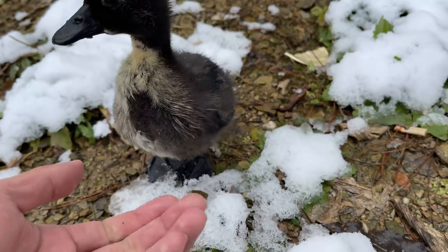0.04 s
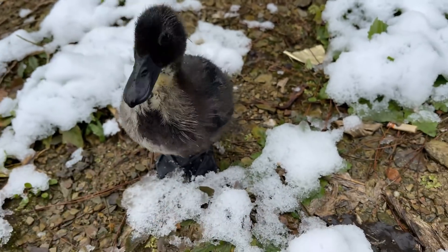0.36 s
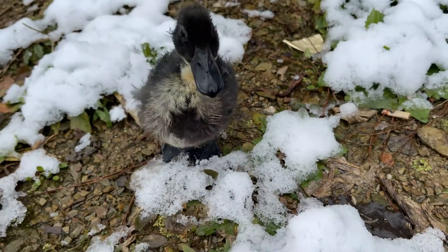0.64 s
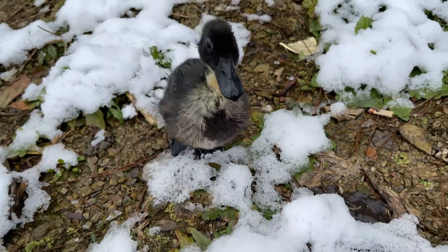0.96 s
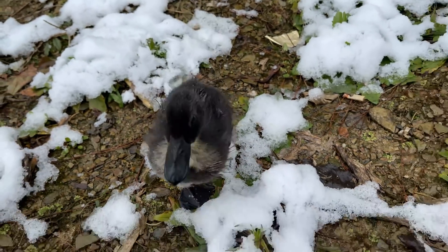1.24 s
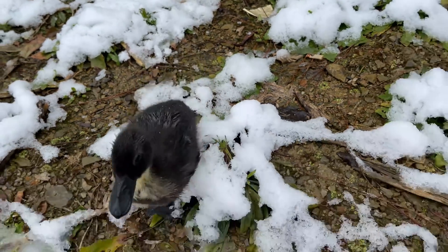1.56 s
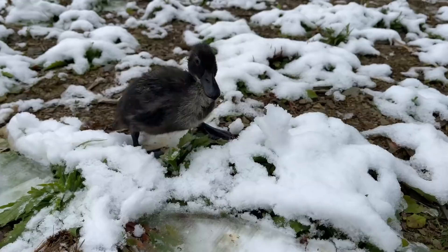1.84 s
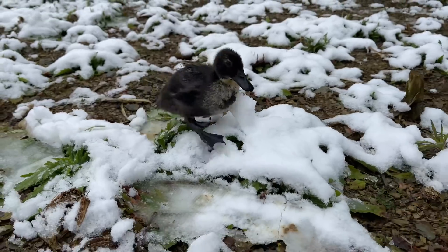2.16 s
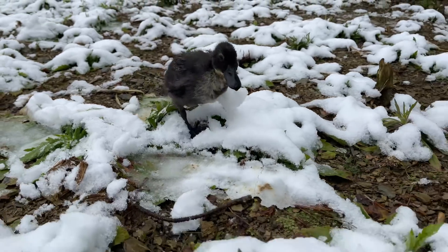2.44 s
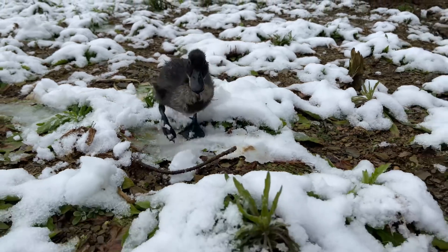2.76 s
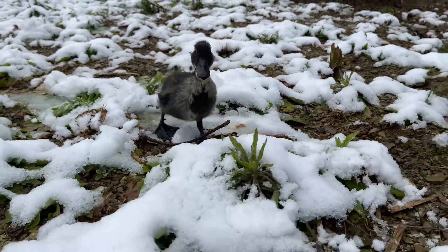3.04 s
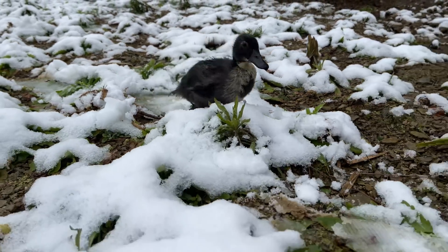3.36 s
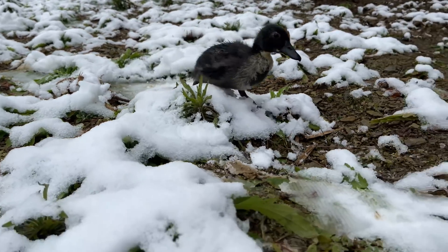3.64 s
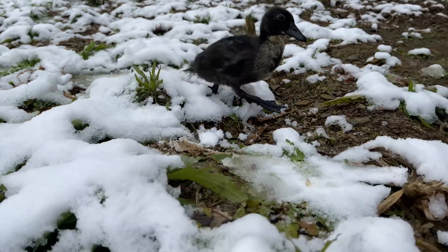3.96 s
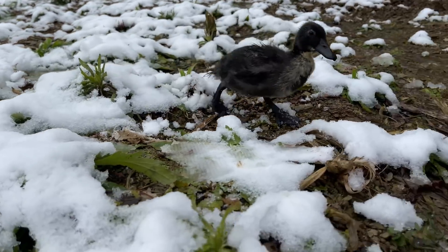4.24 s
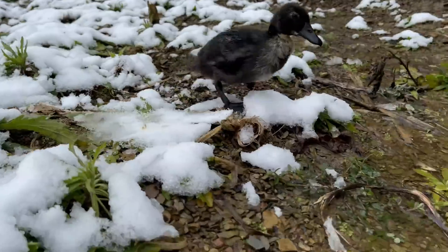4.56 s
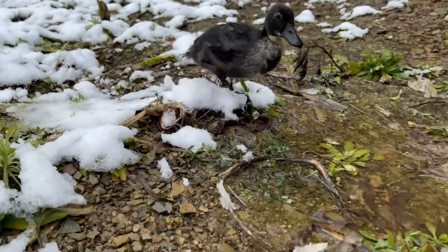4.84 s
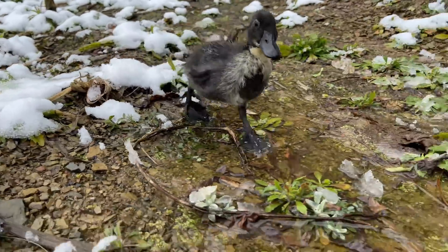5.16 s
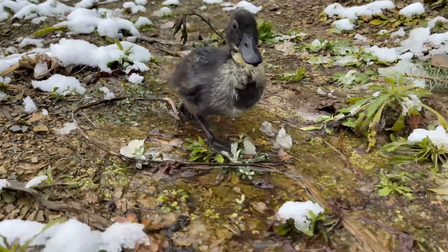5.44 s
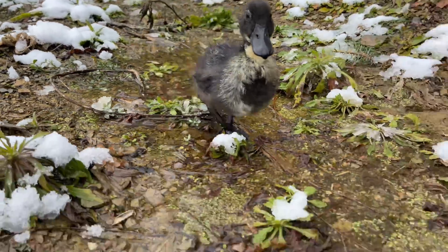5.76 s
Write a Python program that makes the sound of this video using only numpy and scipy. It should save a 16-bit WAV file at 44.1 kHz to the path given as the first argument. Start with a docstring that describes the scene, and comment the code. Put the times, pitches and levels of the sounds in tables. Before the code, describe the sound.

A duckling peeps close by in short high whistles while someone's footsteps scuff and crunch over gravel and wet snow.

```python
"""Outdoors on gravel and wet snow, a duckling peeps close by as it walks. Each peep is a short whistle
that rises and falls, with a second voice beating against it. Someone walks along with it: clothes
rustle and each tread scuffs and crunches, with dull footfalls, small knocks, ticks of grit and one
rubbery squeak. A soft hiss and a low rumble lie underneath, and the sound drops out once for a moment."""
import sys
import numpy as np
from scipy import signal
from scipy.io import wavfile
from scipy.ndimage import uniform_filter1d

SR = 44100
rng = np.random.default_rng(int(sys.argv[2]) if len(sys.argv) > 2 else 0)


def file_out(sig):
    """Save sig as 16-bit WAV at sys.argv[1]."""
    # one column per channel
    cols = np.atleast_2d(sig).T
    # limit, then scale
    lim = np.clip(cols, -1, 1)
    pcm = np.round(lim * 32767).astype(np.int16)
    wavfile.write(sys.argv[1], SR, pcm)


N = 264820
TIME = np.arange(N) / SR
GROUND_LAG_MS, CUTOFF_HZ = .25, 14000

# The tone of six noises. Each row: pitch in Hz, relative strength there in dB.
AIR_TONE = [(30, -17), (80, 12), (350, 6.5), (800, -10.5), (2000, 9), (3500, 1), (7000, 0), (11000, -32.5)]
RUMBLE_TONE = [(25, -22.5), (50, 3.5), (100, -3), (200, -9.5), (400, -11.5), (900, -59)]
SCUFF_TONE = [(120, -7), (350, -3), (700, -5), (1400, 0), (2200, -9), (4000, -10), (9000, -64)]
GRAVEL_TONE = [(1000, -0.5), (2400, 3.5), (3600, 3), (5000, 4), (6400, 7.5), (7600, -5), (9000, -33)]
CRUST_TONE = [(4000, -14), (6500, -12.5), (8300, 44.5), (11500, 19.5), (14000, -62)]
FOOTFALL_TONE = [(50, -14), (130, -2), (300, -1.5), (430, -6), (650, -17.5), (1500, -43)]
# How alike a noise is on the left and right. Each row: pitch in Hz, likeness from 0 to 1.
STEREO_LIKENESS = [(50, 0.938), (300, 0.594), (900, 0.49), (2000, 0.061), (5000, 0.0104), (8000, 0.0164),
                   (10500, 1)]
# Air and handling on the microphone. Each row: time in seconds, level in dB.
RUMBLE_LEVELS = [(0.0, -52), (0.14, -73), (0.22, -46.5), (0.9, -56), (1.35, -41.5), (1.62, -47.5),
                 (1.76, -64), (2.35, -53.5), (3.0, -64.5), (4.25, -53), (4.45, -45), (4.85, -39.5),
                 (5.2, -47.5), (6.0, -36)]
# Where the walker's feet are. Each row: time in seconds, lag in ms (see two_ports), left over right in dB.
FOOT_POSITIONS = [(0.0, -.25, 1), (0.75, -.25, 3.5), (1.3, -.09, -.5), (1.7, -.09, 0), (2.3, .25, -1),
                  (4.5, .3, -4), (5.5, .27, -1), (6.0, .27, -1)]
# Clothes and loose ground rustle. Each row: time in seconds, level in dB, treble level in dB.
RUSTLE_LEVELS = [(0.0, -43.5, -56), (0.5, -53, -74), (0.95, -42.5, -48.5), (1.6, -58.5, -64),
                 (1.76, -56, -52), (2.0, -54.5, -49.5), (2.65, -52, -51.5), (2.95, -56, -58),
                 (3.38, -61, -58.5), (3.65, -53.5, -52.5), (3.9, -55, -51.5), (4.4, -48, -58),
                 (4.88, -48.5, -50), (5.22, -50.5, -50.5), (5.7, -49, -48), (6.0, -43, -37)]
# Shoes press into the ground. Each row: time of fullest weight, swell and release, all in seconds,
# then the levels of the scuff, the gravel and the snow crust in dB.
TREADS = [(0.274, 0.0435, 0.039, -33, -35, -42), (0.38, 0.107, 0.188, -36.5, -38.5, -45.5),
          (0.55, 0.0605, 0.145, -32, -41, -47.5), (0.637, 0.061, 0.186, -30, -27.5, -33.5),
          (0.73, 0.205, 0.263, -35.5, -37, -35), (1.10, 0.247, 0.584, -38.5, -62, -46),
          (1.302, 0.138, 0.21, -34, -33.5, -43.5), (1.38, 0.0245, 0.194, -38, -36.5, -34),
          (1.44, 0.145, 0.17, -32.5, -34.5, -34), (1.565, 0.24, 0.052, -34, -33.5, -33.5),
          (1.651, 0.0712, 0.085, -31, -28.5, -25.5), (1.811, 0.0123, 0.12, -34, -27.5, -35.5),
          (1.898, 0.093, 0.133, -64.5, -36.5, -41), (2.17, 0.051, 0.064, -43, -44, -40.5),
          (3.263, 0.067, 0.07, -43, -44, -39.5), (3.50, 0.071, 0.188, -42.5, -44, -39),
          (3.61, 0.058, 0.066, -64, -43.5, -40.5), (4.03, 0.029, 0.25, -44.5, -46, -51),
          (4.17, 0.107, 0.192, -46.5, -41.5, -54), (4.285, 0.096, 0.63, -44, -38, -49),
          (4.44, 0.35, 0.247, -37, -45, -59), (4.52, 0.16, 0.232, -34.5, -38, -63),
          (4.63, 0.106, 0.083, -58.5, -38, -33.5), (4.767, 0.077, 0.22, -39, -37, -33.5),
          (5.34, 0.045, 0.17, -58, -41, -45.5), (5.509, 0.173, 0.163, -40.5, -37.5, -47.5),
          (5.97, 0.22, 0.07, -39.5, -40.5, -49)]
# The pitches in Hz at which stones and crystals crackle.
CRACKLE_HZ = [1820, 2740, 3850, 5220, 6480, 8330]
# Dull steps. Each row: start in seconds, level in dB, ring time (seconds to fade by 60 dB).
FOOTFALLS = [(0.275, -36.5, 1.88), (.535, -41, 1.01), (.757, -25, 0.136), (1.072, -32.5, 0.254),
             (1.305, -26.5, 0.119), (1.55, -35.5, 0.24), (2.096, -42.5, 1.49), (3.233, -41.5, 2.26),
             (4.411, -40, 0.56), (5.328, -31.5, 1.627), (5.611, -46.5, 1.36), (5.956, -28, 0.089)]
# Stones grind (low) and ice breaks (high). Each row: start and length in seconds, level in dB,
# middle pitch in Hz.
CRUNCHES = [(0.536, 0.12, -41, 788), (1.262, 0.0796, -34.5, 863), (1.355, 0.0386, -32, 976),
            (1.376, 0.07, -55.5, 11800), (1.418, 0.149, -40.5, 728), (1.51, 0.0714, -38.5, 388),
            (1.552, 0.0407, -44, 11800), (1.609, 0.0834, -37.5, 11600), (1.634, .03, -45, 680),
            (3.234, .3, -55, 680), (4.39, 0.1244, -40.5, 782), (4.47, 0.1202, -43.5, 420.5),
            (4.725, 0.0816, -43.5, 1190), (4.735, 0.08, -41.5, 6900)]
# Knocks on stones and wet ground. Each row: start in seconds, level in dB, pitch in Hz,
# ring time in seconds, relative level of the crack in dB.
KNOCKS = [(0.2452, -12, 1388, 0.0235, -37), (0.2459, -7, 2477, 0.0177, -32),
          (0.2478, -18.5, 187, 0.039, -21.5), (.2735, -18, 1080, 0.0072, -2),
          (0.2755, -9, 339.6, 0.0125, -30), (0.55, -12, 990, 0.00595, -27), (.604, -19, 926, 0.0137, -11.5),
          (0.755, -8, 1539, 0.0285, -9), (.759, -19.5, 970, 0.0295, -12),
          (0.763, -14.5, 149.5, 0.02, -24.5), (0.885, -21, 3600, .012, -3.5),
          (0.908, -28, 1100, 0.0144, -7), (0.974, -15, 857, 0.0122, -10), (1.372, -17.5, 900, 0.0165, -1.5),
          (1.381, -20, 376, 0.014, -16), (1.432, -21, 600, 0.0263, -11.5), (1.557, -29, 254, 0.026, -2),
          (1.575, -26, 508, 0.0324, -10), (1.64, -19.5, 803, 0.0102, -5.5), (1.806, -28, 1900, 0.0204, 2),
          (2.000, -23.5, 591, 0.032, -31), (2.0075, -20, 605.4, 0.0213, -25),
          (2.089, -34, 990, 0.0086, -10.5), (2.103, -32, 208, 0.036, -28), (2.239, -26.5, 653, 0.0072, -9),
          (2.322, -18.5, 1864, 0.0168, -8), (2.3252, -28.5, 779, 0.0253, 1.5),
          (2.328, -35, 332, 0.023, 2.5), (2.383, -37, 900, 0.0133, 10.5), (2.657, -26, 1075, 0.0126, -1),
          (3.035, -23.5, 894, 0.0062, -10), (4.386, -31.5, 2780, 0.0067, 11), (4.419, -27, 1430, 0.0147, 7),
          (4.519, -35.5, 1200, 0.0112, 5), (4.509, -23, 374, 0.04, -18.5), (4.531, -28.5, 353, 0.045, -4),
          (4.701, -21, 1905, 0.026, -21.5), (5.017, -27.5, 599, 0.026, -2), (5.228, -29, 693, 0.017, 9.5),
          (5.33, -31.5, 248, 0.038, -19.5), (5.563, -21.5, 656, 0.0082, 8.5),
          (5.795, -35, 4160, 0.0115, 8.5)]
# Grit and ice. Each row: start in seconds, peak level in dB, pitch in Hz, ring time in seconds.
TICKS = [(0.049, -26.5, 9300, 0.0091), (0.35, -26, 10600, 0.0065), (0.884, -19.5, 8460, 0.02),
         (0.898, -28.5, 9670, 0.012), (1.025, -26, 8950, 0.0041), (1.095, -21.5, 9500, 0.062),
         (1.445, -12.5, 10000, 0.0058), (1.457, -22, 9950, 0.0095), (1.494, -22.5, 6170, 0.016),
         (2.385, -28, 8400, 0.019), (2.5113, -24, 10120, 0.018), (2.631, -28, 6960, 0.0194),
         (2.662, -33, 4200, 0.0044), (2.7006, -17, 2590, 0.00805), (2.744, -30, 7170, 0.097),
         (2.98, -27.5, 9080, 0.0052), (4.4456, -23, 9370, 0.0094), (4.488, -29, 7000, .008),
         (4.531, -22, 6440, 0.0117), (4.7404, -30, 8900, 0.116), (5.115, -17, 9780, 0.029),
         (5.1598, -24, 9430, 0.011), (5.2275, -14, 6380, 0.0179), (5.4559, -24.5, 8100, 0.01),
         (5.563, -9.5, 10250, 0.0081), (5.574, -25.5, 9600, 0.0047), (5.5921, -21, 9220, 0.0078),
         (5.7971, -26.5, 4940, 0.006), (5.847, -20.5, 8600, 0.0053)]
# The course of the squeak. Each row: time in seconds, slips per second, level in dB, brightness in dB,
# pitch of the low ring in Hz, relative level of the middle ring in dB.
SQUEAK_CURVES = [(.774, 370, -42, -25, 380, -14), (.779, 375, -21, -25, 400, -14),
                 (.788, 380, -19.5, -10, 620, -7), (.799, 385, -21, -22, 770, -11),
                 (.807, 410, -26, -12, 800, -6), (.812, 430, -18, -3, 420, 0), (.819, 436, -15, 1, 415, 1),
                 (.830, 425, -17, 2, 520, 2), (.839, 405, -18, -8, 400, -7),
                 (.845, 390, -40, -16, 400, -10)]
# The squeak's high rings. Each row: pitch in Hz, width in Hz, relative level in dB.
SQUEAK_HIGH_RINGS = [(2406, 710, -2), (5270, 1840, -17.5)]
# The duckling's calls. Each row: start and length in seconds; first, top and last pitch in Hz; share of
# the length at which the top comes; level, fade from start to end and swell (or dip) of the middle in dB;
# the second voice's relative level in dB and pitch offset in Hz; rasp from 0 to 1; lag in ms.
PEEPS = [(0.028, 0.059, 2284, 3632, 2346, 0.582, -29.5, 3.5, 11.5, -5.5, 370.5, 0.54, -0.287),
         (0.194, 0.0629, 2626, 3887, 3274, 0.578, -28, -7.5, 11, -16.5, -450, 0.8, -0.3055),
         (0.364, 0.0596, 2112, 3973, 2657, 0.538, -24, 17.5, 3, -13.5, -1100, 0.21, -0.262),
         (0.818, 0.0507, 2473, 3710, 1927, 0.453, -32.5, -14.5, -3.5, -17, -450, 0.22, -0.145),
         (0.975, 0.0608, 2011, 3841, 2766, 0.574, -31.5, 10, -12, -12, 421, 0.32, -0.173),
         (1.142, 0.0481, 1950, 3832, 3070, 0.589, -21.5, 35, 4, -23.5, 1104, 0.07, -0.173),
         (1.672, 0.052, 1884, 3152, 1960, .5, -24.5, 6, 2, -17.5, 483, 0.1, -0.0957),
         (1.943, 0.0483, 1822, 2769, 1793, 0.44, -37, 9.5, -2.5, -7.5, 551, 0, -0.122),
         (2.615, 0.0382, 1972, 2540, 2100, 0.57, -39.5, 6, -2.5, -16, 549.5, 0.27, -0.147),
         (2.801, 0.0388, 1887, 2953, 2850, 0.66, -37, 11.5, 2.5, -10.5, 451, 0, -0.145),
         (3.398, 0.0347, 2000, 2487, 2170, 0.518, -38, 5, 2, -4.5, 581, 0, -0.1227),
         (3.562, 0.0444, 1948, 2873, 2505, 0.47, -33, 8.5, 11.5, -4.5, 599.5, 0.17, -0.099),
         (5.077, 0.0501, 2028, 2726, 1980, 0.505, -27.5, 2, 5, -2.5, 536, 0.09, -0.1684),
         (5.242, 0.0562, 1974, 2999, 2032, 0.404, -25, 14.5, 10, -17.5, 548, .15, -0.1278),
         (5.412, 0.0472, 1867, 2836, 2290, 0.457, -25.5, 12.5, 5.5, -14, 581, 0, -0.1585)]
# The tone of the two microphone openings (ports). Each row: pitch in Hz, width in Hz, boost or cut in dB.
LEFT_PORT = [(1100, 350, -3), (5300, 1400, 2.5), (7100, 900, -4), (8500, 800, -2), (10200, 1300, 3)]
RIGHT_PORT = [(900, 500, 1), (6000, 2000, -3), (8200, 600, 2), (10200, 1300, 3)]


def from_db(db):
    """Turn decibels into a number to multiply by."""
    return 10 ** (np.asarray(db) / 20)


def rms_one(x):
    """Scale a signal to an average strength (rms) of 1."""
    return x / np.sqrt(np.mean(x ** 2) + 1e-20)


def in_time(rows):
    """Join the rows of a table with straight lines: one curve in time for each column."""
    times, *columns = np.transpose(rows)
    return [np.interp(TIME, times, column) for column in columns]


def at_hz(rows, hz):
    """Read a table's value at one pitch, blending between its rows."""
    pitches, values = np.transpose(rows)
    return np.interp(np.log(hz), np.log(pitches), values)


def drift(rate, size=N):
    """A smooth random wobble, about 1 in size, that changes about rate times a second."""
    step = 40  # samples between random points
    r = np.exp(-2 * np.pi * rate * step / SR)
    slow = signal.lfilter([1], [1, -2 * r, r * r], rng.standard_normal(size // step + 2002))
    slow = rms_one(slow[1000:])
    return np.interp(np.arange(size) / step, np.arange(len(slow)), slow)


def resonance(x, hz, width_hz):
    """Let x ring at one pitch; a narrower width rings longer."""
    r = np.exp(-np.pi * width_hz / SR)
    feedback = [1, -2 * r * np.cos(2 * np.pi * hz / SR), r * r]
    return signal.lfilter(np.array([1, 0, -1]) * (1 - r * r) / 2, feedback, x + 1e-18)


def moving_resonance(x, hz, width_hz):
    """Let x ring at a pitch that follows the curve hz."""
    r = np.exp(-np.pi * width_hz / SR)
    turn = np.exp(2j * np.pi * np.cumsum(hz) / SR)
    return 2 * np.real(turn * signal.lfilter([1 - r], [1, -r], x / turn))


def two_ports(x, lag_ms):
    """Make stereo: one side comes late, the left for positive lag_ms, the right for negative."""
    lag = np.rint(lag_ms * SR / 1000).astype(int)
    i = np.arange(len(x))
    return np.array([x[np.clip(i - lag, 0, i)], x[np.clip(i + lag, 0, i)]])


def pan_left(db):
    """Two gains that make the left side db louder than the right."""
    return from_db(db * np.array([[.5], [-.5]]))


def foot_position(seconds):
    """The lag in ms and the left and right gains of a sound at the walker's feet."""
    times, lag_ms, pan_db = np.transpose(FOOT_POSITIONS)
    return np.interp(seconds, times, lag_ms), pan_left(np.interp(seconds, times, pan_db))


def add(out, start, sound):
    """Mix a stereo sound in, start seconds from the beginning."""
    i = max(int(start * SR), 0)
    out[:, i:i + sound.shape[1]] += sound[:, :N - i]


def burst(ring_s, hz, width_hz):
    """A contact: noise around one pitch that dies away quickly; its peak is 1."""
    t = TIME[:SR // 6]
    sound = resonance(rng.standard_normal(len(t)) * from_db(-60 * t / ring_s), hz, width_hz)
    return sound / abs(sound).max()


def grainy_noise(tone, flicker_db, flicker_rate, grain_db=2.5, lag_ms=GROUND_LAG_MS):
    """Grainy stereo noise in half-octave bands that flicker partly together; its strength is 1."""
    out, edges = 0, 22 * 2 ** np.arange(0, 9.6, .5)
    together = drift(flicker_rate)
    grains = from_db(grain_db * np.clip(drift(500), -3, 2.6))
    white = rng.standard_normal((2, 3, N)) * grains  # two sets of shared, left and right noise
    for k, (low, high) in enumerate(zip(edges, edges[1:])):
        hz = np.sqrt(low * high)
        if not tone[0][0] / 2 < hz < tone[-1][0] * 2:
            continue
        band = signal.sosfilt(signal.butter(2, [low, high], "band", fs=SR, output="sos"), white[k % 2])
        alike = at_hz(STEREO_LIKENESS, hz)
        stereo = np.sqrt(alike) * two_ports(band[0], lag_ms) + np.sqrt(1 - alike) * band[1:]
        flicker = together + 1.397 * drift(flicker_rate)
        out = out + from_db(at_hz(tone, hz) + flicker_db * flicker) * stereo
    return rms_one(out)


def scatter(x, echo_db=-24, ring_s=0.074):
    """Stones and snow throw back a faint, short echo."""
    t = TIME[:SR // 5]
    tail = rng.standard_normal((2, len(t))) * from_db(-60 * t / ring_s) * (t > .003)
    echo = signal.fftconvolve(x, tail / np.linalg.norm(tail[0]), axes=1)[:, :N]
    return x + from_db(echo_db) * echo


def cut_treble(x, hz):
    """Steeply remove everything above hz."""
    return signal.sosfilt(signal.cheby1(8, .5, hz, fs=SR, output="sos"), x)


def port(x, tone):
    """A microphone opening boosts some pitches and weakens others."""
    for hz, width_hz, db in tone:
        x = x + (from_db(db) - 1) * resonance(x, hz, width_hz)
    return x


def air(level_db=-49):
    """The soft, even hiss of the outdoors."""
    return from_db(level_db) * grainy_noise(AIR_TONE, flicker_db=0.92, flicker_rate=19, grain_db=2)


def rumble():
    """Air and handling on the microphone make a low noise that comes and goes."""
    level_db, = in_time(RUMBLE_LEVELS)
    return from_db(level_db) * grainy_noise(RUMBLE_TONE, flicker_db=2.5, flicker_rate=7.2)


def crackle(lag_ms, snaps_per_s=130, spread_db=6.5):
    """Single stones and crystals give way: snaps of very uneven size, each with its own tone."""
    snapping = rng.random(N) < snaps_per_s / SR
    snaps = snapping * from_db(spread_db * np.minimum(rng.exponential(1, N), 2.5))
    rings = sum(resonance(snaps * rng.standard_normal(N), hz, 0.318 * hz) for hz in CRACKLE_HZ)
    return two_ports(rms_one(rings), lag_ms)


def treads(swell_db=25, crackle_db=-11.5):
    """Over a light rustle each tread swells and lets go: the sole scuffs, gravel and crust crunch."""
    rustle_db, treble_db = in_time(RUSTLE_LEVELS)
    power = from_db([rustle_db, rustle_db - 1.5, treble_db]) ** 2  # scuff, gravel, crust
    for fullest, swell, release, *levels_db in TREADS:
        away = np.maximum((fullest - TIME) / swell, (TIME - fullest) / release)
        weight = from_db(-swell_db * np.minimum(away, 10))
        power += np.outer(from_db(levels_db), weight) ** 2
    scuff_gain, gravel_gain, crust_gain = np.sqrt(power)
    lag_ms, pan = foot_position(TIME)
    scuff = grainy_noise(SCUFF_TONE, flicker_db=2, flicker_rate=28.7, lag_ms=lag_ms)
    gravel = grainy_noise(GRAVEL_TONE, flicker_db=2, flicker_rate=23.4, grain_db=2, lag_ms=lag_ms)
    gravel = rms_one(gravel + from_db(crackle_db) * crackle(lag_ms))
    crust = grainy_noise(CRUST_TONE, flicker_db=2.5, flicker_rate=15.44)
    return scuff_gain * pan * scuff + gravel_gain * gravel + crust_gain * crust


def footfalls(attack_s=0.00433):
    """Weight comes down on soft ground: a dull, lumpy noise that starts at once and fades."""
    weight = np.zeros(N)
    for start, level_db, ring_s in FOOTFALLS:
        age = np.maximum(TIME - start, 0)
        fade_db = np.minimum(60 * age / ring_s, 120)
        weight += np.minimum(age / attack_s, 1) * from_db(level_db - fade_db)
    lag_ms, pan = foot_position(TIME)
    return weight * pan * grainy_noise(FOOTFALL_TONE, flicker_db=1.5, flicker_rate=26.7, lag_ms=lag_ms)


def crunches(pitch_count=10, octaves=1.036, grains_per_s=700, spread_db=0.5, ring_cycles=9.4):
    """Under the sole a cluster of grains gives way, each ringing briefly at one of several pitches."""
    out = np.zeros((2, N))
    for start, length, level_db, middle_hz in CRUNCHES:
        size = int(length * SR)
        pitches = np.minimum(middle_hz * 2 ** (octaves * np.linspace(-.5, .5, pitch_count)), CUTOFF_HZ)
        breaks = rng.random((pitch_count, size)) < grains_per_s / pitch_count / SR
        clicks = breaks * rng.choice([-1, 1], breaks.shape)
        clicks = clicks * from_db(-spread_db * rng.standard_normal(breaks.shape))
        rings = sum(resonance(row, hz, 2 * hz / ring_cycles) / np.sqrt(hz)
                    for row, hz in zip(clicks, pitches))
        swell = np.sin(np.pi * np.arange(size) / size)
        lag_ms, pan = foot_position(start)
        add(out, start, pan * two_ports(from_db(level_db) * rms_one(rings * swell), lag_ms))
    return out


def knocks():
    """A knock on stone or wet ground: one fading note and a thump under a short crack."""
    out, t = np.zeros((2, N)), TIME[:SR // 6]
    for start, level_db, hz, ring_s, crack_db in KNOCKS:
        ring = np.sin(2 * np.pi * hz * t) * from_db(-60 * t / ring_s)
        thump = burst(ring_s, hz, width_hz=hz)
        crack = burst(ring_s=0.0103, hz=2500, width_hz=5000)
        sound = 0.799 * ring + 0.238 * thump + from_db(crack_db) * crack
        lag_ms, pan = foot_position(start)
        add(out, start, pan * two_ports(from_db(level_db) * sound, lag_ms))
    return out


def ticks():
    """Grit and ice crystals snap with a short, bright ring."""
    out = np.zeros((2, N))
    for start, peak_db, hz, ring_s in TICKS:
        snap = burst(ring_s, hz, width_hz=0.183 * hz)
        add(out, start, two_ports(from_db(peak_db) * snap, GROUND_LAG_MS))
    return out


def squeak(jitter=0.015, roughness=0.0937, top_hz=6500):
    """A rubbery stick and slip: nearly even pulses drive one sliding low ring and a few steady ones."""
    slips_per_s, level_db, bright_db, low_hz, middle_db = in_time(SQUEAK_CURVES)
    sounding = (TIME > SQUEAK_CURVES[0][0]) & (TIME < SQUEAK_CURVES[-1][0])
    slip_count = np.cumsum(slips_per_s * (1 + jitter * drift(163))) / SR
    pulses = np.diff(np.floor(slip_count), prepend=0)
    grit = roughness * rng.standard_normal(N) * (1 - slip_count % 1) ** 2
    low = moving_resonance(pulses + grit, low_hz, width_hz=122)
    middle = from_db(middle_db) * resonance(pulses + grit, hz=1234, width_hz=510)
    high = sum(from_db(db) * resonance(.5 * pulses + 2 * grit, hz, width_hz)
               for hz, width_hz, db in SQUEAK_HIGH_RINGS)
    rings = low - middle + from_db(bright_db) * high
    sound = signal.sosfilt(signal.butter(6, top_hz, fs=SR, output="sos"), rings)
    even = sound / np.sqrt(uniform_filter1d(sound ** 2, size=400) + 1e-12)  # steady loudness
    return two_ports(even * sounding * from_db(level_db), lag_ms=-.2) * pan_left(db=4)


def duckling(waver=0.00383, rasp_waver=0.0763, hoarseness=0.032, flutter_db=3, edge_s=.002):
    """One side of the voice box whistles an arch; the other, a little off in pitch, beats against it."""
    out = np.zeros((2, N))
    for (start, length, first_hz, top_hz, last_hz, crest, level_db, fade_db, swell_db,
         second_db, offset_hz, rasp, lag_ms) in PEEPS:
        t = np.arange(int(length * SR)) / SR
        along = t / t[-1]  # 0 to 1 through the peep
        rising = np.maximum(1 - along / crest, 0)
        falling = np.maximum((along - crest) / (1 - crest), 0)
        hz = top_hz - (top_hz - first_hz) * rising ** 2 - (top_hz - last_hz) * falling ** 2
        cracking = rasp * np.exp(-((along - 0.305) / 0.195) ** 2)  # the voice cracks on the way up
        wobble = (waver + rasp_waver * cracking) * drift(125, size=len(t))
        phase = 2 * np.pi * np.cumsum(hz * (1 + wobble)) / SR
        second_voice = from_db(second_db) * np.sin(phase + 2 * np.pi * offset_hz * t)
        octave_db = -28 + 12.5 * (top_hz / 1000 - 3)  # higher, more urgent peeps are brighter
        overtones = from_db(octave_db) * np.sin(2 * phase) + from_db(-36) * np.sin(3 * phase)
        bloom = np.sin(np.pi * along)  # the voice is richest in the middle
        whistle = np.sin(phase) + bloom * (second_voice + overtones)
        # the membrane flaps unevenly, which makes the whistle hoarse
        flapping = rms_one(resonance(rng.standard_normal(len(t)), hz=380, width_hz=283))
        hoarse = rms_one(1 + (cracking + hoarseness * bloom) * flapping)
        # each peep's loudness fades (or grows), and swells or dips in the middle
        loudness_db = level_db + fade_db * (.5 - along) - swell_db * (2 * along - 1) ** 2
        loudness_db += flutter_db * drift(280, size=len(t))
        soft_edges = np.clip(np.minimum(t, t[-1] - t) / edge_s, 0, 1)
        voice = whistle * hoarse * soft_edges * from_db(loudness_db)
        add(out, start, two_ports(voice, lag_ms) * pan_left(db=2))
    throat = resonance(out, hz=3800, width_hz=296)  # lifts the tops of the high peeps
    return out + 0.167 * throat


def scene():
    """Mix the background, the walker and the duckling; only the crunches keep their highest treble."""
    background = rumble() + air()
    short_sounds = scatter(duckling() + knocks() + ticks() + squeak())
    mix = background + short_sounds + footfalls() + treads()
    return cut_treble(mix, hz=11400) + scatter(crunches())


def record(dry, widen=0.353, dropout_s=(1.763, 1.804)):
    """Each port colours its side, the low mids get wider, the sound drops out once, the top is cut."""
    heard = np.array([port(dry[0], LEFT_PORT), port(dry[1], RIGHT_PORT)])
    side = widen * resonance((heard[0] - heard[1]) / 2, hz=600, width_hz=600)
    silent = (TIME > dropout_s[0]) & (TIME < dropout_s[1])
    sound_on = uniform_filter1d(1. - silent, size=100)
    return cut_treble((heard + [side, -side]) * sound_on, CUTOFF_HZ)


dry = scene()
out = record(dry)
file_out(out)
```